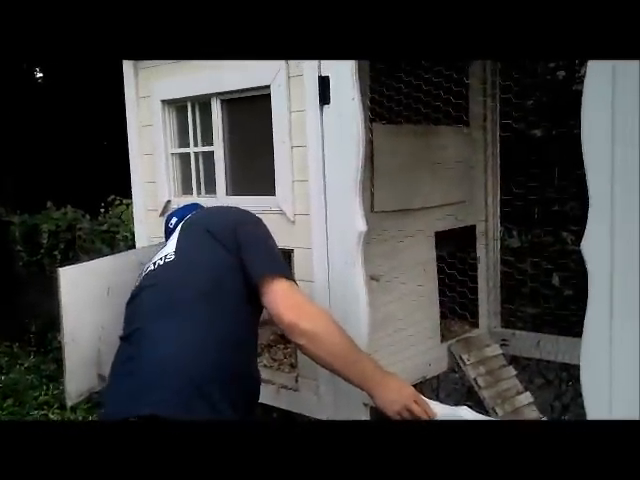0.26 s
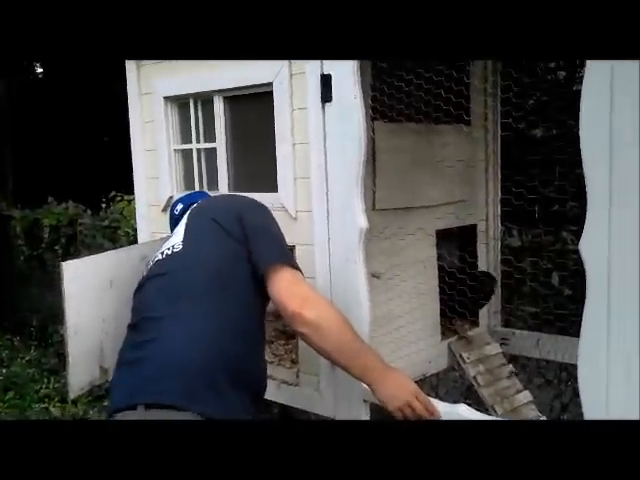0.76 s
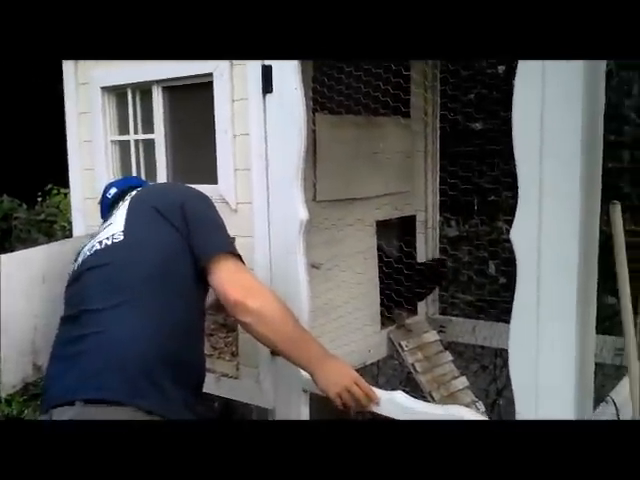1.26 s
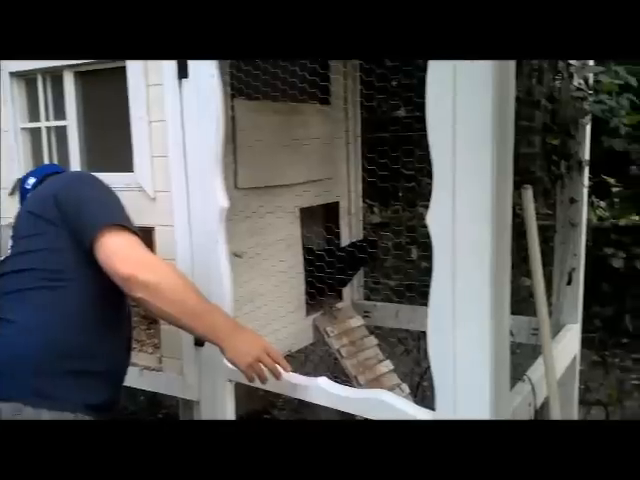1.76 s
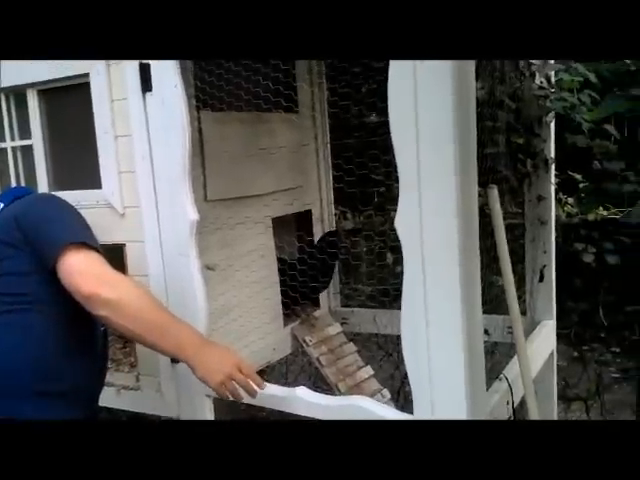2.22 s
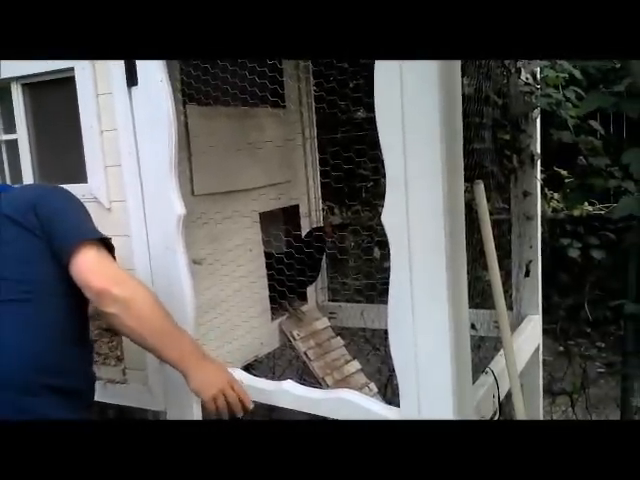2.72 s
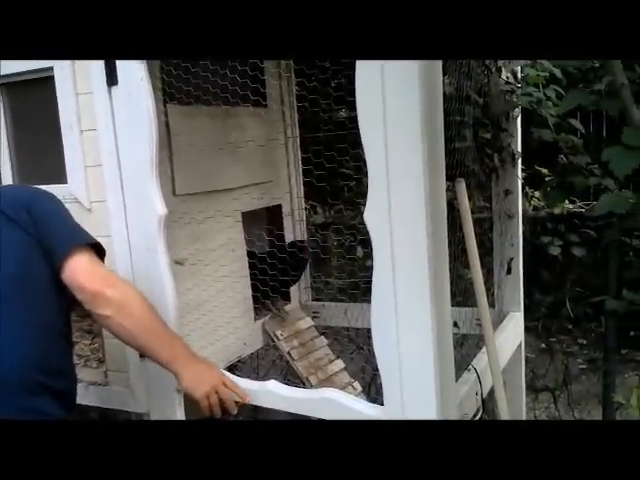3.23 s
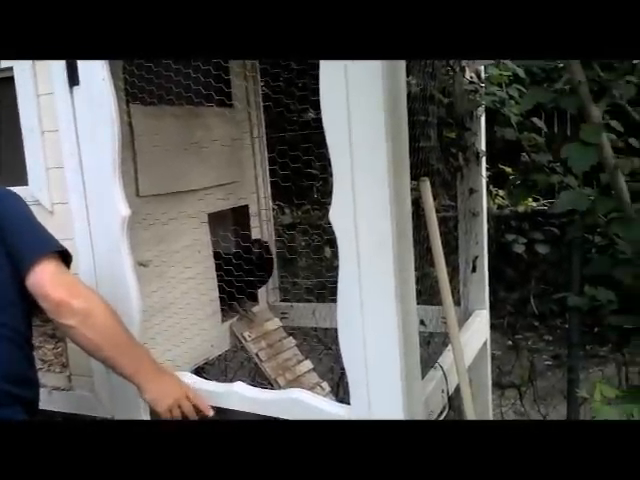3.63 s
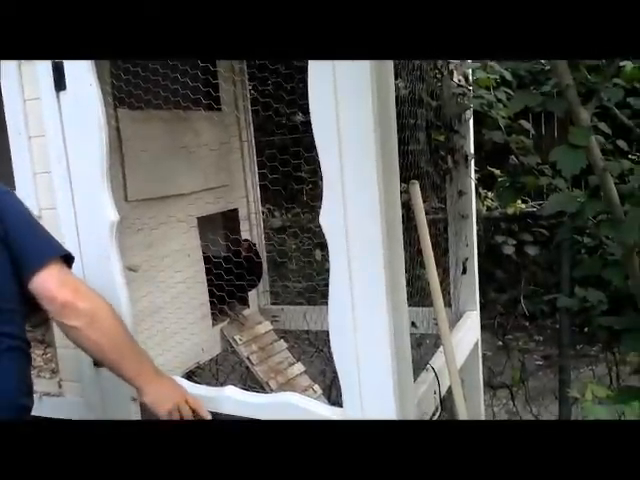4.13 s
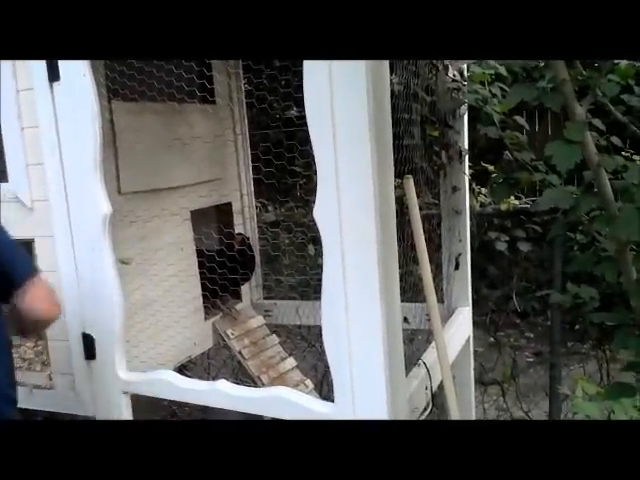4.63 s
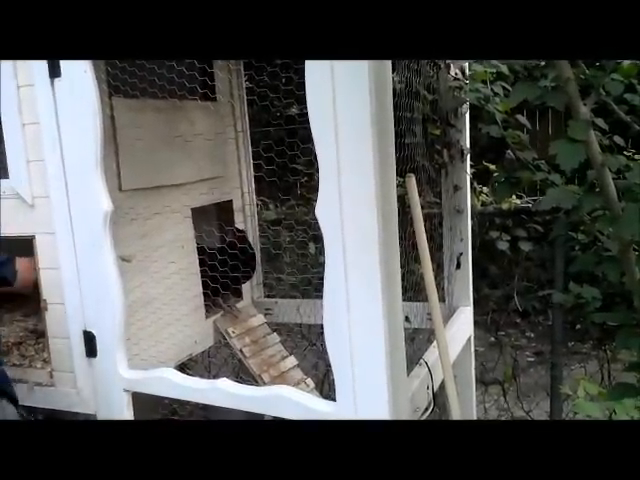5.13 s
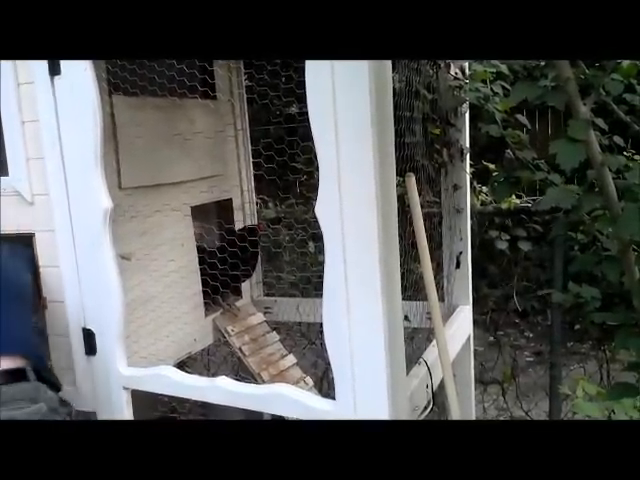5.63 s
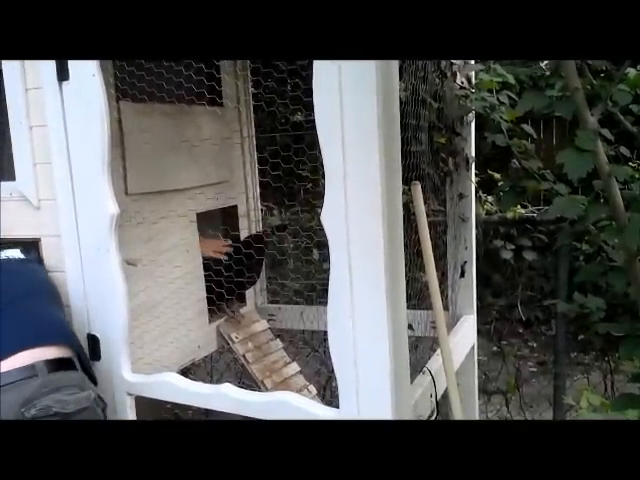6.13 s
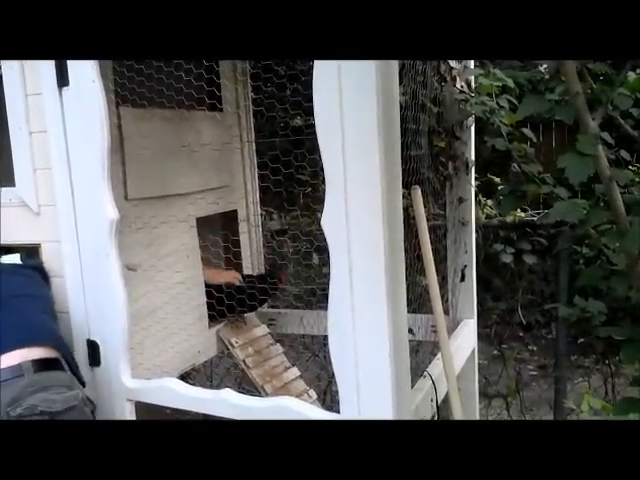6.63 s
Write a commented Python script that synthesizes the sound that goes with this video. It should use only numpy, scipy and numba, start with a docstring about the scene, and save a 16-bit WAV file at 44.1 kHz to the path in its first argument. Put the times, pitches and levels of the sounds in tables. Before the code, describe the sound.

A thick cicada chorus drones throughout, bright and hissy, dipping briefly about once a second. Nearer cicadas add short raspy buzzes in turns. Faint low fan hum and yard air sit beneath. Two small claw taps knock wooden boards near one second. From just after four seconds a hen gives brief, rough, low clucks at the coop door. Small camera microphone outdoors, thin and oddly wide stereo.

```python
"""A cicada chorus drones from the start over yard air and a far fan unit's hum, sagging at each phrase end.
Four nearer singers buzz in turns as combs of tymbal overtones; two claw taps ring wooden boards.
Thin bands near 6 kHz swell from a far singer; then a hen clucks in short bursts at the door of a wooden coop,
her rough throat pulses shaped by throat, mouth, chest and beak.
A small camera widens its stereo by sending the right channel inverted and slightly late."""
import sys
import numpy as np
from scipy import signal
from scipy.fft import rfft, irfft, next_fast_len
from scipy.io import wavfile
from scipy.ndimage import uniform_filter1d
from numba import njit

SR = 44100
rng = np.random.default_rng(int(sys.argv[2]) if len(sys.argv) > 2 else 0)


def store_wav(level_fs):
    """Save 16-bit WAV to argv[1]."""
    pcm = np.round(np.clip(np.atleast_2d(level_fs), -1, 1) * 32767)
    wavfile.write(sys.argv[1], SR, pcm.T.astype(np.int16))


N = 302967
T = np.arange(N) / SR


def undb(db):
    """Decibels to linear gain."""
    return 10 ** (np.asarray(db) / 20)


def unit(x):
    """Scale to an RMS of 1, so that a gain sets the level."""
    return x / np.sqrt(np.mean(x ** 2))


def noise():
    """White noise for the whole scene."""
    return rng.standard_normal(N)


def columns(table):
    """Each column of a curve table, interpolated sample by sample."""
    s, *cols = np.transpose(table)
    return [np.interp(T, s, c) for c in cols]


@njit
def svf(x, hz, width):
    """State-variable band-pass with a moving centre, gain 1 there."""
    y, band, low = np.empty(len(x)), 0., 0.
    for i in range(len(x)):
        g = np.tan(np.pi * hz[i] / SR)
        damping = width / hz[i]
        v = (band + g * (x[i] - low)) / (1 + g * (g + damping))
        band, low, y[i] = 2 * v - band, low + 2 * g * v, damping * v
    return y


def ring(x, hz, width):
    """A steep resonance: the band-pass twice."""
    hz = hz + np.zeros(N)
    once = svf(x, hz, 1. * width)
    return svf(once, hz, 1. * width)


def body(x, modes):
    """Parallel resonances of a body, with alternating polarity."""
    return sum((-1) ** k * undb(db) * ring(x, hz, width) for k, (hz, width, db) in enumerate(modes))


def pulses(hz, jitter, scatter_db):
    """One click per cycle, split over two samples; also the cycle phase 0-1."""
    turns = np.cumsum(hz) / SR
    k = np.arange(1, int(turns[-1]))
    timing, loudness = rng.standard_normal((2, len(k)))
    at = np.interp(k, turns, np.arange(N))
    spot = at.astype(int)
    at = np.clip(at + (jitter * SR / hz)[spot] * timing, 0, N - 2)
    size = undb(scatter_db[spot] * loudness)
    i = at.astype(int)
    late = at - i
    clicks = np.bincount(i, size * (1 - late), N) + np.bincount(i + 1, size * late, N)
    return clicks, turns % 1


def walk(rate):
    """Random levels held 1 / rate s and smoothed twice; spread near 1."""
    k = int(SR / rate)
    steps = np.repeat(rng.standard_normal(N // k + 1), k)
    return 1.495 * uniform_filter1d(uniform_filter1d(steps, k), k)[:N]


def echoes(x, t60, wet_db):
    """Scattered reflections from leaves, boards and ground."""
    s = T[:int(t60 * SR)]
    tail = rng.standard_normal(len(s)) * 1000 ** (-s / t60)
    return x + undb(wet_db) * signal.fftconvolve(x, tail / np.sqrt(np.sum(tail ** 2)))[:N]


# the chorus sags at each phrase end: start_s, length_s, depth_db
CHORUS_SAGS = [(0.367, 0.25, 1), (1.42, 0.2, 3), (2.494, 0.15, 3), (3.555, 0.16, 2.5), (4.58, 0.17, 3),
               (5.365, 0.15, 4), (5.95, 0.17, 4), (6.491, 0.12, 4)]
SAG_FALL_S, SAG_BACK_S, REGROW_S = 0.041, 0.064, 0.33  # first drop, quick return, time constant of the climb
SAG_LEFT = 0.23  # share of the depth left to the slow climb


def sag_db():
    """How far the chorus has dropped: a fall, a trough, a quick return, then a slow climb."""
    out = np.zeros(N)
    for t, length, depth_db in CHORUS_SAGS:
        after = T - t - length
        trough = np.interp(T - t, [0, SAG_FALL_S, length], [0, .7, 1.0])
        slow = SAG_LEFT * np.exp(-np.maximum(after, 0) / REGROW_S)
        quick = (1 - SAG_LEFT) * np.clip(1 - after / SAG_BACK_S, 0, 1)
        out += depth_db * trough * (slow + quick)
    return out


# slow swell of the chorus, before sags and flicker: time_s, level_db, treble_db
CHORUS_SWELL = [(0, -38.5, -50), (.4, -34, -50), (.9, -34, -46.5), (1.4, -32, -45.5), (1.9, -32.5, -45),
                (2.5, -30.5, -45), (3.5, -31.5, -44), (4.5, -30.5, -43.5), (5.3, -29.5, -43),
                (6.0, -29.5, -42.5), (6.87, -28.5, -43.5)]
# steady core resonances of the chorus: centre_hz, width_hz (each pass), relative_db
CORE_RESONANCES = [(3674, 1100, -10), (4760, 70, -1), (5950, 390, -11)]
# treble resonances of the chorus: centre_hz, width_hz (each pass), relative_db
TREBLE_RESONANCES = [(7570, 1140, 3), (9280, 3000, -4.5), (10730, 1960, -2), (11970, 660, -9)]
DRONE_HZ = 138  # mean tymbal cycles a second
TREBLE_SAG = 2.6  # treble depth over core depth
TYMBAL_HZ, TYMBAL_DRIFT_HZ_PER_S, TYMBAL_SAG_HZ_PER_DB = 5410, -24.5, 49


def drone():
    """Many tymbals blur into noise; the loudest one still gates it twice a cycle."""
    db, treble_db = columns(CHORUS_SWELL)
    sag = sag_db()
    tymbal_hz = TYMBAL_HZ + TYMBAL_DRIFT_HZ_PER_S * T - TYMBAL_SAG_HZ_PER_DB * sag
    cycle_hz = DRONE_HZ * (1 + 0.0099 * walk(3.4))
    gate = 1 + 0.073 * np.cos(4 * np.pi * np.cumsum(cycle_hz) / SR)
    core = unit(ring(gate * noise(), tymbal_hz, 1370) + body(noise(), CORE_RESONANCES))
    treble = unit(body(ring(gate * noise(), 7850, 10500), TREBLE_RESONANCES))
    core_gain = undb(db - sag + 1.4 * walk(12))
    treble_gain = undb(treble_db - TREBLE_SAG * sag + 1.2 * walk(15))
    return core_gain * core + treble_gain * treble


# yard air and far insects, mean spectrum: frequency_hz, level_db (per Hz)
AIR_SPECTRUM = [(25, -69), (60, -70), (100, -71), (170, -68), (300, -70.5), (500, -73.5), (1000, -80),
                (1550, -86.5), (2000, -83), (2750, -88), (3300, -76.5), (4200, -77), (7000, -80.5),
                (11500, -99.5), (12800, -102), (14000, -99), (16000, -100)]


def yard_air():
    """Coloured air noise whose octaves waver separately."""
    size = next_fast_len(N)
    f = np.fft.rfftfreq(size, 1 / SR)
    hz, db = np.transpose(AIR_SPECTRUM)
    colour = undb(np.interp(np.log(f + 1), np.log(hz), db))
    spec = rfft(noise(), size) * colour * np.sqrt(SR / 2)
    octave = np.log2((f + 1) / 30)
    out = np.zeros(N)
    for k in range(11):
        band = irfft(spec * np.clip(1 - abs(octave - k), 0, 1), size)[:N]
        out += undb(.9 * walk(7)) * band
    return out


# noisy hum bands of the fan unit: centre_hz, width_hz (each pass), level_db
FAN_BANDS = [(80, 11, -58.5), (115, 11.5, -58), (236, 20, -57), (353.5, 15.6, -55)]


def fan_hum():
    """Narrow bands of noise make the fan unit's blurred hum lines."""
    return sum(undb(db) * unit(ring(noise(), hz, width)) for hz, width, db in FAN_BANDS)


# the strongest tone of the hum wavers, before its lift: time_s, level_db
FAN_TONE_WAVERS = [(0.0, -64), (0.04, -52), (0.44, -58), (0.53, -48), (0.99, -60), (1.01, -49), (1.18, -64),
                   (1.22, -45), (1.3, -55), (1.62, -48), (1.66, -75), (1.99, -50.5), (2.26, -55),
                   (2.41, -44.5), (2.54, -65), (2.66, -42), (2.73, -63), (2.95, -46), (3.1, -72),
                   (3.23, -48), (4.0, -56.5), (4.06, -67), (4.11, -58), (4.32, -65), (4.38, -53),
                   (6.87, -52.5)]
FAN_TONE_HZ = 233.8  # mean pitch
FAN_TONE_LIFT_DB = 3.5  # before the widener, over its level in the middle of the stereo picture


def fan_tone():
    """The fan unit's strongest tone, a sine with wandering pitch and level."""
    turns = np.cumsum(FAN_TONE_HZ + 1.488 * walk(6)) / SR
    gain = undb(FAN_TONE_LIFT_DB + columns(FAN_TONE_WAVERS)[0])
    return gain * np.sqrt(2) * np.sin(2 * np.pi * turns)


BELLY_DROP_DB, LINE_FLICKER_DB, FLICKER_S = 20, 4, .02
FAVOUR_DB, FAVOUR_WIDTH_HZ = 4, 110  # lift of the lines near the favoured pitch


def tymbal_lines(u, length, hz, turns, multiples, gain, favour_hz):
    """Regular tymbal cycles give a comb of overtones, coloured by the moving belly resonance."""
    count = (len(multiples), 1)
    start = rng.random(count)
    scatter = undb(1.2 * rng.standard_normal(len(multiples)))
    off = (multiples * hz - favour_hz) / FAVOUR_WIDTH_HZ
    gain = gain * scatter * undb(FAVOUR_DB * (np.exp(-off ** 2) - .5))
    # the belly resonance drops through the phrase: upper lines lead, lower lines last
    tilt = undb(BELLY_DROP_DB * np.outer(np.linspace(-1, 1, len(multiples)), .5 - u))
    waver = np.cos(2 * np.pi * (u * length / FLICKER_S * rng.random(count) / 2 + start))
    tilt = tilt * undb(LINE_FLICKER_DB * waver)
    tilt = tilt / np.sqrt((gain ** 2 @ tilt ** 2).mean() / 2)  # colour moves, level stays
    return gain @ (tilt * np.sin(2 * np.pi * (np.outer(multiples, turns) + start)))


# phrases of four nearer singers: start_s, length_s, lines_db, rasp_db (before its growth), favoured_pitch_hz
SINGER_PHRASES = [
    [(.31, 0.23, -39.5, -38, 4640), (1.18, 0.2, -38.5, -41, 3740), (2.045, 0.21, -36, -45, 3850),
     (2.885, 0.18, -34, -54, 4460), (3.72, 0.177, -35, -33, 4460), (4.52, 0.15, -36.5, -29, 4460),
     (5.28, 0.16, -38, -33, 3920), (6.05, 0.17, -39.5, -30, 4460)],
    [(.48, 0.17, -38.5, -39, 4050), (1.36, 0.11, -38, -35, 4000), (2.25, 0.17, -34.5, -50, 4060),
     (3.145, 0.17, -34, -46, 3980), (4.05, 0.18, -34.5, -40, 4100), (4.95, 0.17, -34, -48, 3960),
     (5.86, 0.21, -34.5, -43, 4150), (6.73, 0.19, -33.5, -40, 4336)],
    [(1.43, 0.18, -36, -36, 3600), (2.49, 0.19, -34.5, -43, 4090), (3.55, 0.21, -34, -43, 4290),
     (4.6, 0.27, -38, -34, 3740), (5.41, 0.19, -37.5, -37, 3740), (5.97, 0.23, -36, -38, 3740),
     (6.51, 0.19, -38, -36, 3753)],
    [(2.38, 0.14, -37, -55, 3820), (3.3, 0.13, -44, -54, 3820)],
]
# tymbal rate of each singer: nominal_rate_hz (at 0 s), creep_hz_per_s, rise_share, end_sag_share
TYMBAL_RATES = [(178.35, .06, .018, .03), (161.7, .59, .03, .06), (185.4, .33, .012, .022),
                (190.5, 0, .005, .005)]
# overtones of each singer: first_multiple (of the cycle rate), relative_db (of it and each next multiple)
SINGER_OVERTONES = [(18, [-14, -12, -10, -2, 0, -10, -7, 1, -9, -8]),
                    (20, [-9, -16, -7, -3, -3, -1, -2, -3, -6]),
                    (18, [-7, -10, -2, -6, -3, -3, -7, -10, -7]), (20, [0, -20])]
# each singer's closing note over its lines: relative_db
CLOSING_NOTE_DB = [-3, -7, -12, -20]
LEAD_S, LEAD_DB, LEAD_HZ = 0.039, 2.5, 4680  # lead-in rasp; level over the lines
CLOSE_HZ, CLOSE_WIDTH_HZ = 4000, 340
WOBBLE = .0015  # share of the tymbal rate


def singers():
    """Tymbal lines rise in, hold and sag; a high rasp leads in, one falls beside them, a rough note closes."""
    out, lead, close, rasp_gain = np.zeros((4, N))
    rasp_hz = np.full(N, 4000.)
    wobble = WOBBLE * walk(30)
    for phrases, rate, (first, db), close_db in zip(
            SINGER_PHRASES, TYMBAL_RATES, SINGER_OVERTONES, CLOSING_NOTE_DB):
        nominal_hz, creep, rise, sag = rate
        multiples = first + np.arange(len(db))
        gain = undb(db) / np.sqrt(np.sum(undb(db) ** 2) / 2)
        for t, length, lines_db, rasp_db, favour_hz in phrases:
            span = slice(int(t * SR), min(int((t + length) * SR), N))
            u = (T[span] - t) / length  # progress 0-1
            hz = nominal_hz + creep * t
            bend = 1.003 - rise * np.exp(-u / .12) - sag * u ** 4 + wobble[span]
            turns = np.cumsum(hz * bend) / SR
            lines = tymbal_lines(u, length, hz, turns, multiples, gain, favour_hz)
            swell = np.clip(np.minimum(u / .12, (.9 - u) / .3), 0, 1)
            out[span] += swell * undb(lines_db) * lines
            lead += undb(lines_db + LEAD_DB) * np.interp(T - t, [-LEAD_S, 0, LEAD_S / 2], [0, 1, 0])
            close[span] += undb(lines_db + close_db) * np.exp(-((u - .8) / 0.17) ** 2)
            rasp_hz[span] = 3900 + 1000 * np.exp(-u / .3)
            rasp_gain[span] += swell * undb(rasp_db) * (0.16 + 0.58 * u)
    out += lead * unit(ring(noise(), LEAD_HZ, 790))
    out += close * unit(ring(noise(), CLOSE_HZ, CLOSE_WIDTH_HZ))
    out += rasp_gain * unit(ring(noise(), rasp_hz, 1100))
    return echoes(out, .22, -8)


# claws on wood: start_s, level_db
CLAW_TAPS = [(.782, -35.5), (1.046, -34)]
# ringing modes of the boards: pitch_hz, relative_db, t60_s
BOARD_MODES = [(616, -5, .03), (870, -2, 0.033), (1210, -6, .025), (1650, -4, 0.035), (2180, -12, 0.013)]


def claws():
    """A short knock rings the boards as decaying sines."""
    out, s = np.zeros(N), T[:3000]
    for t, db in CLAW_TAPS:
        knock = sum(undb(g) * np.sin(2 * np.pi * hz * s) * 1000 ** (-s / t60) for hz, g, t60 in BOARD_MODES)
        out[int(t * SR):int(t * SR) + len(s)] += undb(db) * knock
    return out


# strands of a far, high singer: centre_hz, width_hz (each pass), relative_db
SHIMMER_STRANDS = [(5761, 60, -6), (5916, 45, 0), (6040, 60, -3), (6210, 60, -7)]
# when the strands come and go: start_s, length_s, level_db
STRAND_SWELLS = [(2.1, 0.38, -46), (3.0, 0.75, -40.5), (3.88, 0.82, -40), (4.9, 0.35, -45), (5.7, .4, -40),
                 (6.201, 0.44, -43)]
SHIMMER_FADE_S = 0.096


def shimmer():
    """Narrow noise bands near 6 kHz waver and come and go in long swells."""
    gain = np.zeros(N)
    for t, length, db in STRAND_SWELLS:
        corners = [0, SHIMMER_FADE_S, length - SHIMMER_FADE_S, length]
        gain += undb(db) * np.interp(T - t, corners, [0, 1, 1, 0])
    return gain * unit(body(noise(), SHIMMER_STRANDS))


# clucks: start_s, burst_s, length_s, peak_db, tail_db, pitch_hz, end_pitch_hz, throat_hz, end_throat_hz,
# roughness (0-1, at the start), chest_db, beak_db (both relative to the voice mix); levels before echoes
HEN_CLUCKS = [(4.23, 0.015, 0.055, -34.5, -40.5, 342.4, 313.7, 730, 686, 0.47, -4, -9.5),
              (4.289, 0.022, 0.037, -37.5, -42, 318.8, 309.7, 710, 785, 0.2, -6, -16),
              (4.435, 0.026, 0.063, -37.5, -44, 350, 305, 690, 920, 0.37, -3, -10),
              (4.631, 0.014, 0.075, -39, -45, 356, 324.8, 724, 1050, 0.42, -5, -11),
              (4.824, 0.022, 0.067, -40, -43, 356.4, 315.2, 720, 1020, 0.4, -12, -7.5),
              (5.032, 0.012, .044, -38, -46, 332.4, 305.2, 720, 695, .5, -4, -12),
              (5.723, 0.0065, 0.016, -31, -53, 283, 283, 562, 607, 0.3, -2, -13),
              (5.747, 0.016, 0.052, -32.5, -46, 318.4, 311.2, 920, 865, 0.4, -16, -13),
              (6.465, 0.02, 0.028, -30.5, -41, 310, 323.4, 910, 971, 0.21, -3, -12),
              (6.498, 0.012, 0.022, -45, -50, 321, 325, 957, 980, 0.5, -17, 4.5),
              (6.666, 0.025, 0.064, -33.5, -48, 369.3, 413, 960, 800, 0.37, 0.5, -5.5)]
# fixed resonances of the hen: centre_hz, width_hz (each pass), relative_db
CHEST_RESONANCE = [(400, 190, 0)]
MOUTH_RESONANCE = [(640, 220, -5)]
BEAK_RESONANCES = [(1312, 180, -5), (1790, 1000, -5)]
CLUCK_ATTACK_S, CLUCK_DROP_S, CLUCK_RELEASE_S = .004, .006, .012
CLUCK_SAG_DB, CLUCK_FADE_DB = -4, -3  # fall along the burst; fall along the tail
CLUCK_HOARSENS = .15  # roughness gained late in the cluck


def hen():
    """Jittered throat pulses and breath pass a moving throat and fixed body: a sudden burst, a fading tail."""
    gain, rows = np.zeros(N), []
    for t, burst, length, db, tail_db, hz, end_hz, throat_hz, end_throat_hz, rough, *colour_db in HEN_CLUCKS:
        drop = min(burst + CLUCK_DROP_S, length)
        times = [-CLUCK_ATTACK_S, 0, burst, drop, length, length + CLUCK_RELEASE_S]
        levels = [db - 30, db, db + CLUCK_SAG_DB, tail_db, tail_db + CLUCK_FADE_DB, tail_db - 30]
        gain += undb(np.interp(T - t, times, levels, -200, -200))
        rows.append((t, hz, throat_hz, rough, *colour_db))
        # the end values arrive partway through the cluck
        rows.append((t + 0.683 * length, end_hz, end_throat_hz, rough + CLUCK_HOARSENS, *colour_db))
    hz, throat_hz, rough, chest_db, beak_db = columns(rows)
    rough = np.clip(rough, 0, 1)
    clicks, phase = pulses(hz, .1 * rough, 4.0 * rough)
    breath = .8 * rough * np.exp(-phase / .22) * noise()  # a puff after each pulse
    source = unit(clicks) + breath
    voice = ring(source, throat_hz, 400) - body(source, MOUTH_RESONANCE)
    voice -= undb(chest_db) * body(source, CHEST_RESONANCE)
    voice -= undb(beak_db) * body(source, BEAK_RESONANCES)
    return echoes(gain * unit(voice), .05, -12)


def scene():
    """Two draws of the noise beds, sharing the near sounds."""
    near = hen() + claws() + singers() + shimmer() + fan_tone()
    return np.array([near + drone() + yard_air() + fan_hum() for draw in range(2)])


# stereo colour by frequency: frequency_hz, right_louder_db, likeness (of mid and side, 0-1),
# extra_phase_rad, dip_depth_power
STEREO_COLOUR = [(39.8, 4.5, 0.3, 0, 1.7), (137, -4.5, 0.14, 0.79, 1.1), (237, -0.5, 0.75, 0.94, 2.2),
                 (620, -1, 1, 0.79, 0.54), (1050, 5, 0, 0.99, 0.88), (1320, 14.5, 0.33, 0.24, 5),
                 (2345, 10, 0.3, 0.46, 0.25), (2336, -15, 0.2, 0.33, 1.93), (2960, 6.5, .1, 0.43, 4.3),
                 (3125, 2.5, 1, 0.013, 0.83), (5500, 3, 0.99, 0.15, 0.92), (7600, 1, 1, 0, 0.77),
                 (10470, 1.5, 0.8, 0, 0.93), (11800, -3, 0, 0, 4), (16000, -5, .05, 0, 2.2)]
LAG_S = 16 / SR  # lateness of the right channel
TOP_HZ = 15680  # steep top cut


def record(dry):
    """The inverted, late right channel combs mid and side in turn; the second draw makes part of the side diffuse."""
    size = next_fast_len(N + 8192)
    f = np.fft.rfftfreq(size, 1 / SR)
    hz, *cols = np.transpose(STEREO_COLOUR)
    tilt_db, like, extra, dip_power = (np.interp(f, hz, c) for c in cols)
    like = np.clip(like, 0, 1)
    left = undb(-tilt_db / 2)
    right = -undb(tilt_db / 2) * np.exp(-1j * (2 * np.pi * f * LAG_S + extra))
    mid, side = (left + right) / 2, (left - right) / 2
    # powers above 1 hollow out the mid and side dips, below 1 fill them
    mid, side = (g * (abs(g) + 1e-6) ** (dip_power - 1) for g in (mid, side))
    norm = np.sqrt(abs(mid) ** 2 + abs(side) ** 2)
    first, second = rfft(dry, size) / norm
    side_input = like * first + 1j * np.sqrt(1 - like ** 2) * second
    m = irfft(first * mid, size)[:N]
    s = irfft(side * side_input, size)[:N]
    top_cut = signal.ellip(12, .2, 70, TOP_HZ, fs=SR, output="sos")
    return signal.sosfilt(top_cut, np.array([m + s, m - s]))


dry = scene()
out = record(dry)
store_wav(out)
```